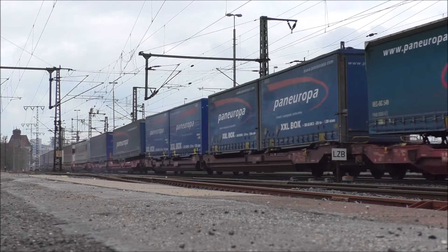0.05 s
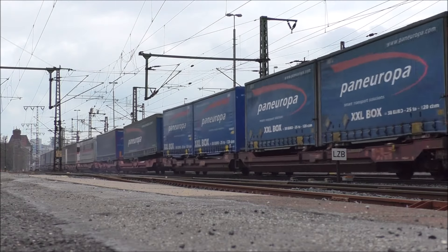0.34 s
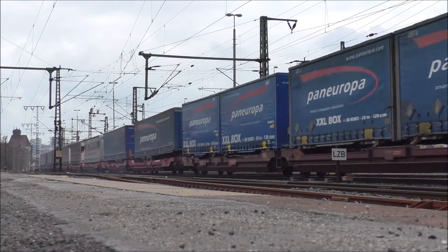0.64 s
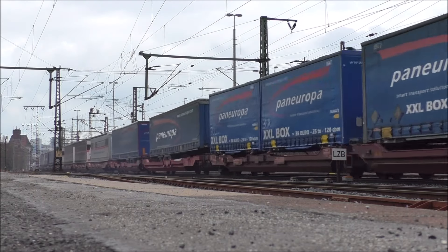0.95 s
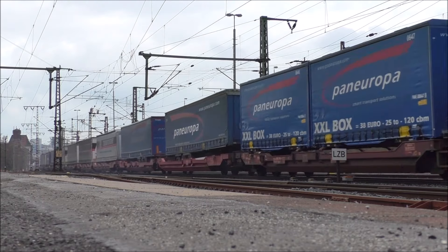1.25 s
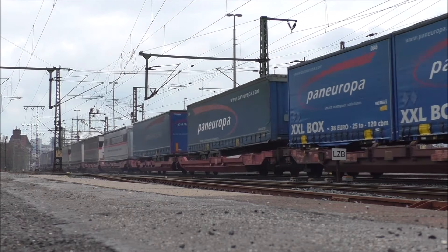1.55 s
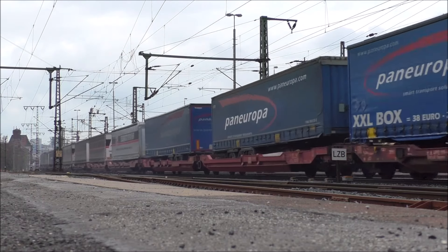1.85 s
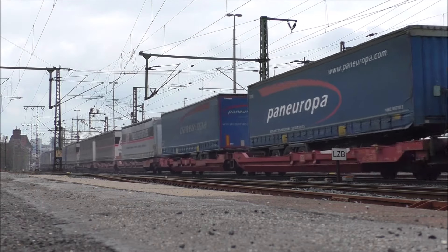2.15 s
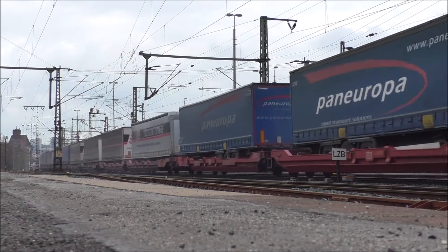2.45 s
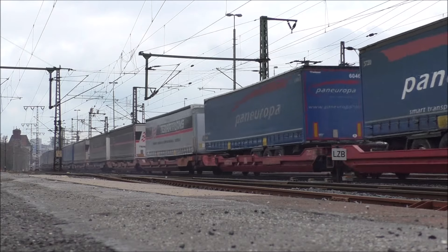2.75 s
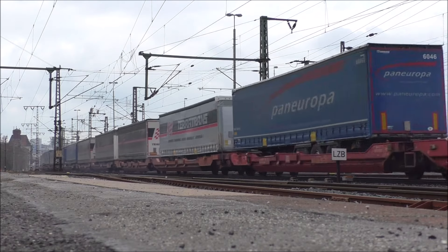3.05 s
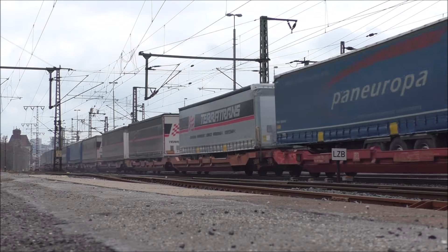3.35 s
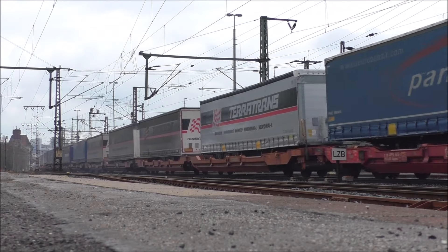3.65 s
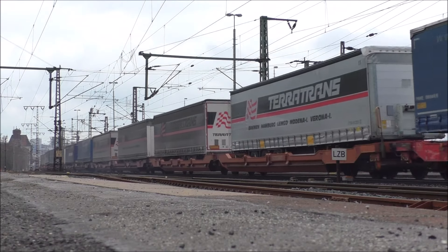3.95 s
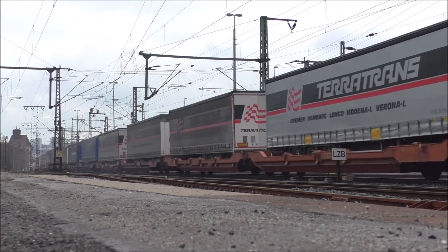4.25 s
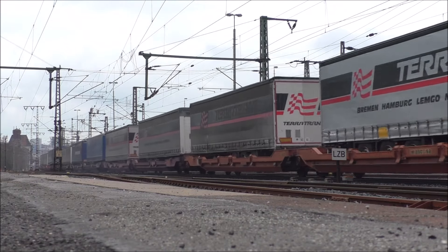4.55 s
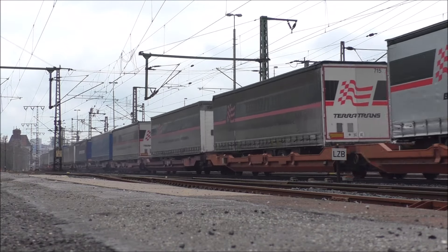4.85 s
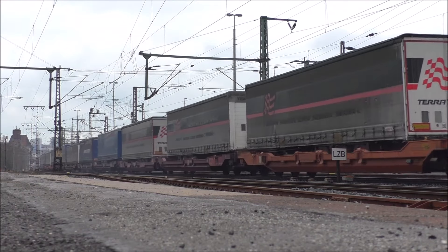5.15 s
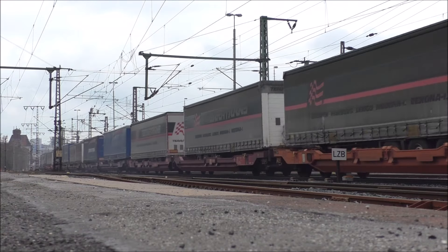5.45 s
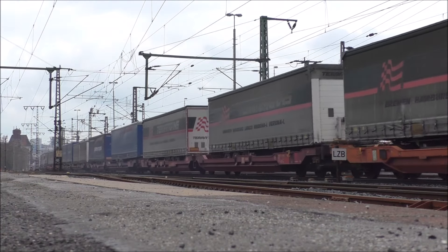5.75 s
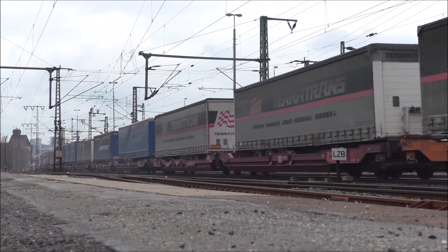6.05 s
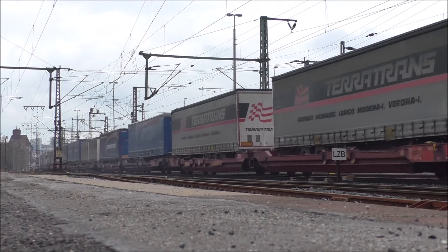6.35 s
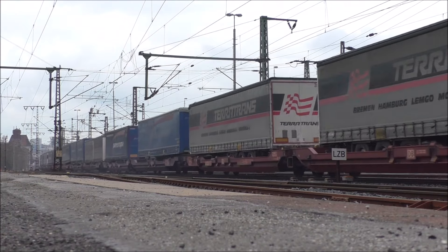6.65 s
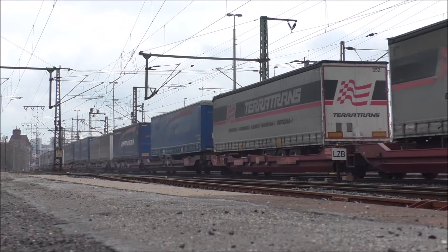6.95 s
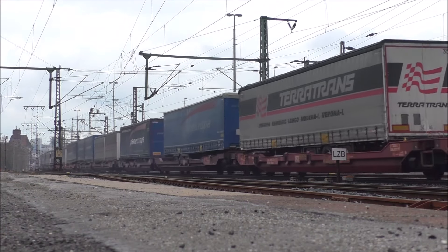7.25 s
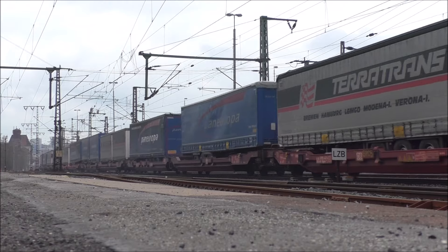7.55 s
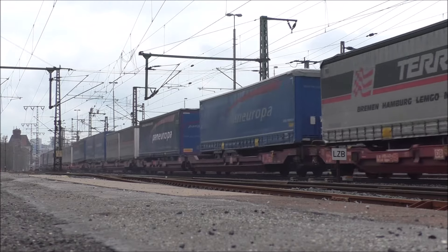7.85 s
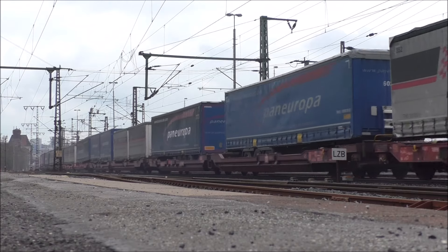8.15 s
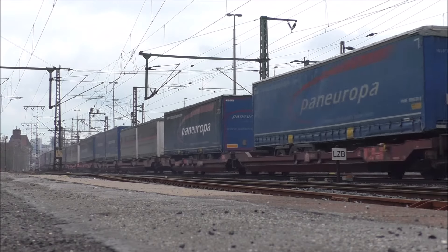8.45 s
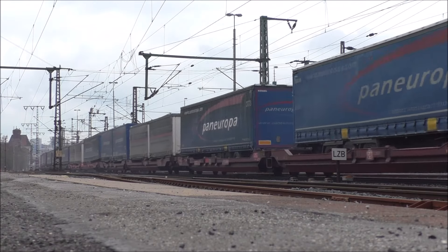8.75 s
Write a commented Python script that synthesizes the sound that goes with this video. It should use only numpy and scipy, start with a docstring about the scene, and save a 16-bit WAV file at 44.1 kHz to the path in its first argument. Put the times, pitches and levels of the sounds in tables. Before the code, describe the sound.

A long freight train rolls through a station yard about twelve metres away, braking lightly, for roughly nine seconds. From the start the wagons drone and rumble, the rails roar and the wheels ring, with a fine brake hiss and faint clinking that swell as each set of wheels passes. The rumble builds over the first two seconds, with occasional soft booms and hums from the wagon bodies. From about 1.5 seconds, brakes give short, high squeaks and wheels sing thin notes that sink slightly as they go by. From about 4.6 seconds, wheels and couplings clank irregularly with brief gritty scrapes, busiest between 6 and 7 seconds and again after 8. A sharper squeak stands out near 6.8 seconds. Towards the end the rail roar eases, while low track thudding, brake hiss and the squeal of distant wheels grow louder over the continuing rumble.

```python
"""A long freight train rolls through a station yard about twelve metres away, braking lightly.
First the wagons rumble, the rails roar, the wheels ring and the brake blocks hiss and scrape.
After a second or so, rubbing blocks make wheels squeak and sing two high notes that sink as they pass.
From halfway on, wheels and couplings clank, steel on steel. Towards the end the rails grow quieter,
while the hiss of the brakes and the squeal of distant wheels grow louder."""
import sys
import numpy as np
from scipy import signal
from scipy.fft import rfft, irfft
from scipy.io import wavfile
from scipy.ndimage import uniform_filter1d

SR = 44100
rng = np.random.default_rng(int(sys.argv[2]) if len(sys.argv) > 2 else 0)


def transcribe(signal):
    """Save signal, clipped to [-1, 1], as a 16-bit WAV file at the path in sys.argv[1]."""
    frames = np.atleast_2d(signal).T
    limited = np.clip(frames, -1, 1)
    pcm = np.round(limited * 32767).astype(np.int16)
    wavfile.write(sys.argv[1], SR, pcm)


N = 393372
TIME = np.arange(N) / SR
SPEED_M_S, DISTANCE_M, SOUND_SPEED_M_S = 18, 12., 343

# Levels in the tables are relative: the functions turn them up or down.
# drone of the wagon bodies: (time [s], level [dB])
RUMBLE_LEVEL = [(0, -48), (1.2, -44.5), (2.3, -42.5), (4, -42), (5.1, -41), (5.9, -43.5), (8.92, -42)]
# tone of that drone, from low to high: (frequency [Hz], level [dB])
RUMBLE_COLOUR = [(70, -57), (105, -36), (122, -32), (135, -7.5), (150, -13.5), (182, 1), (232, -1),
                 (258, 2), (285, -2), (308, -13), (355, -12.5), (410, -17.5), (520, -21.5), (1200, -75)]
# weight of the wagons, which deepens the rumble: (time [s], gain of the deep part [dB])
WAGON_LOAD = [(0, -6.5), (1.1, -3), (2.1, -7.5), (2.8, 0.5), (4.1, -0.5), (4.8, -6.5), (5.6, 0), (6.5, 0.5),
              (7.7, -2.5), (8.92, -2)]
# a wagon body booms as it rocks: (time [s], swell [dB])
BOOMS = [(2.149, 8.5), (2.51, 2), (4.37, 4.5), (4.685, 4.5), (4.77, 5.5), (4.94, 3.5), (5.21, 5), (5.76, 5),
         (6.05, 6), (6.99, 4.5), (7.47, 5), (8.068, 4), (8.61, 7), (8.82, 4.5)]
# thudding of the track on its bed of stones: (time [s], level [dB])
THUD_LEVEL = [(0, -69.5), (1.1, -64), (2.6, -64.5), (4.6, -63), (5.4, -64), (6.1, -59.5), (7.2, -60),
              (8, -62), (8.92, -57)]
# tone of that thudding: (frequency [Hz], level [dB])
THUD_COLOUR = [(15, -32), (30, -27), (45, -20), (62, -4), (74, -0.5), (85, 9), (97, 0.5), (115, 1),
               (170, -13), (600, -70)]
# roar of the rails: (time [s], level [dB])
RAIL_LEVEL = [(0, -52), (1.2, -47), (1.8, -48), (3.8, -51), (6.6, -53), (8.92, -55.5)]
# tone of that roar: (frequency [Hz], level [dB])
RAIL_COLOUR = [(150, -47), (270, 4.5), (345, 5.5), (420, -1.5), (520, -0.5), (680, 0.5), (950, -1),
               (1400, -10.5), (3000, -16.5), (8000, -60)]
# tone of the ringing wheels: (frequency [Hz], level [dB])
WHEEL_COLOUR = [(300, -18), (800, -7.5), (1200, 1.5), (1600, 2.5), (2300, -1), (3100, -5.5), (4200, -9),
                (5200, -12.5), (6500, -24.5), (9000, -32), (15000, -46)]
# hiss of the brake blocks along the whole train: (time [s], level [dB])
BRAKE_LEVEL = [(0, -63), (1, -69.5), (4, -67.5), (5.2, -66), (6.2, -64), (7.6, -62.5), (8.92, -62)]
# tone of that hiss: (frequency [Hz], level [dB])
BRAKE_COLOUR = [(1000, -16), (2500, 9.5), (4000, 10), (5300, 6), (6200, 9), (6700, 3.5), (7200, 4),
                (7900, -1.5), (9400, -3), (11100, -6), (12200, -9.5), (13000, -6.5), (14200, -18),
                (15200, -21)]
# bogies, the wheeled frames under a wagon: (passing time [s], wheel ring [dB], brake hiss [dB])
BOGIES = [(0.03, -52.5, -74), (.6, -61, -84), (1.06, -49.5, -67), (1.58, -49.5, -65.5), (2.0, -53.5, -73),
          (2.42, -51, -67.5), (2.96, -49.5, -67), (3.55, -55.5, -68.5), (4.57, -50, -71), (5.39, -53, -65),
          (6.24, -51.5, -64), (6.66, -55, -68), (7.36, -64, -71), (8.26, -52, -62.5), (8.7, -61, -63)]
# singing wheels: (passing time [s], pitch at rest [Hz], low note [dB], high note [dB], fade time [s])
SINGING_WHEELS = [(1.621, 5600, -68, -79, 0.3), (2.351, 5700, -65, -84, .4), (3.07, 5690, -65, -78, .7),
                  (3.281, 5940, -62, -77, 0.75), (4.201, 5770, -63, -78, 0.71),
                  (5.13, 5880, -64, -72, 0.79), (5.36, 5910, -60, -75, .9), (5.6, 5730, -62, -80, 0.57),
                  (6.399, 5700, -61, -72, .6), (7.28, 5660, -61, -72, .6), (7.35, 5745, -62, -69, 0.95),
                  (7.7, 5650, -62, -73, 0.55), (8.199, 5600, -62, -75, 0.5)]
# squeaks when a brake block grabs: (time [s], pitch [Hz], level [dB], rough length [s])
SQUEAKS = [(1.43, 11830, -71, 0.076), (1.638, 5575, -63, .07), (1.743, 5550, -59.5, 0.07),
           (1.73, 5410, -63, .06), (1.74, 11580, -70, 0.074), (2.445, 5550, -59.5, 0.066),
           (2.73, 11600, -71, .03), (2.74, 5845, -62, .06), (2.85, 5880, -59, 0.076),
           (2.995, 6065, -56.5, 0.14), (3.044, 12680, -72, 0.12), (3.144, 5900, -61.5, 0.12),
           (3.463, 5580, -58, 0.1), (3.604, 5730, -59, 0.15), (3.71, 5475, -59.5, 0.13),
           (3.764, 5700, -51.5, 0.075), (3.89, 6010, -61, 0.075), (3.92, 12200, -73, 0.13),
           (4, 12570, -70, .05), (4.464, 5800, -59, 0.08), (4.534, 12800, -74, .13),
           (4.647, 5970, -55, 0.061), (4.885, 5920, -57, 0.052), (4.887, 12400, -62.5, 0.046),
           (5.086, 6080, -60, 0.054), (5.418, 12200, -59, 0.028), (5.503, 5670, -55, 0.11),
           (5.64, 5760, -60, 0.088), (5.722, 11910, -62, 0.085), (5.8, 5740, -61, .08),
           (5.915, 5900, -55.5, 0.075), (5.903, 11950, -65, .03), (6.118, 12300, -65, 0.025),
           (6.275, 11900, -55, 0.031), (6.46, 11950, -57.5, 0.034), (6.466, 5600, -53, .06),
           (6.606, 5970, -56, 0.1), (6.66, 6150, -58, 0.046), (6.826, 11600, -53.5, 0.04),
           (6.83, 5570, -46, .035), (6.92, 11660, -65, .04), (7.093, 5870, -63, 0.11),
           (7.112, 12320, -64, .05), (7.248, 12040, -66, .08), (7.666, 5590, -58, 0.12),
           (7.69, 5490, -59, .08), (7.83, 5680, -60, .08), (7.85, 11900, -67, .05),
           (7.97, 5520, -60.5, 0.16), (8.252, 5770, -52.5, 0.077), (8.654, 11620, -64, .025)]
# knocks of wheels and couplings: (time [s], level [dB], centre of the ringing [Hz])
CLANKS = [(4.624, -42, 1400), (4.705, -49, 2300), (4.875, -44, 1980), (5.011, -42, 2300),
          (5.315, -49, 3000), (5.63, -41.5, 1500), (6.096, -39, 2600), (6.226, -43, 1400),
          (6.262, -42, 2500), (6.45, -38.5, 3200), (6.505, -58, 1400), (6.662, -38, 1500),
          (7.21, -44, 2300), (7.27, -49, 2600), (7.415, -44.5, 2500), (8.175, -40, 1400),
          (8.305, -48, 1300), (8.345, -43, 2500), (8.456, -41.5, 1500), (8.743, -42, 2300)]
# natural notes of the steel under the wagons: (pitch [Hz], level [dB], base time to fade by 60 dB [s])
STEEL_NOTES = [(1269, 9, 0.16), (1580, 6, 0.21), (2302, 9, 0.12), (2610, 1.5, 0.19), (4000, -5, .12),
               (7000, -5, 0.088), (8270, -1, 0.09), (9100, -8, 0.08), (10600, -19, .08), (11300, -2, .12)]
# scrapes of brakes and other steel parts: (time [s], level [dB], centre [Hz], rough length [s])
SCRAPES = [(.843, -65, 9000, .018), (1.61, -58, 5500, 0.029), (2.261, -61, 6560, .05),
           (2.587, -61, 5980, .03), (4.28, -62, 10000, .028), (4.317, -58, 10000, 0.028),
           (4.64, -59.5, 6500, .025), (4.877, -61, 9500, 0.012), (5, -52, 2200, 0.077),
           (5.31, -58, 3400, .022), (6.086, -52, 5030, 0.029), (6.088, -61, 8300, .025),
           (6.163, -58, 10000, 0.022), (6.21, -64, 9000, .035), (6.26, -54, 9000, .028),
           (6.268, -53, 5500, 0.022), (6.352, -59, 7500, .03), (6.625, -59, 8500, 0.027),
           (6.663, -46, 3600, 0.041), (6.815, -44, 4280, 0.034), (6.815, -58, 9000, 0.027),
           (7.646, -52, 1990, 0.07), (7.955, -63, 8000, .03), (8.347, -50, 2310, 0.043),
           (8.348, -58, 9500, .018), (8.437, -60, 10000, 0.079), (8.497, -59, 10000, .025),
           (8.553, -51, 3200, 0.034), (8.68, -55, 7000, 0.025), (8.747, -45, 3700, 0.021)]
# humming panels and wheels: (time [s], pitch [Hz], level [dB], half length [s], glide [Hz/s])
HUMS = [(1.417, 264, -47, 0.63, -33.5), (2.031, 283, -45.5, 0.48, -19.5), (3.1, 255, -48, .5, -3.5),
        (3.597, 259, -44.5, .45, 9.5), (4.05, 247, -42, 0.6, -8), (4.453, 345, -51, 0.44, 40.5),
        (4.65, 258, -41.5, 0.52, -4.5), (4.922, 248, -38.5, .2, 0.5), (5.05, 210, -46, .35, 16),
        (5.27, 286, -45.5, 0.34, -12.5), (5.97, 207, -42.5, .3, 75.5), (6.302, 255, -43.5, 0.23, 49.5),
        (6.849, 216, -51, .3, 69), (7.2, 793, -64, .4, -36), (7.52, 140, -53.5, 0.38, -47),
        (7.63, 772, -55.5, 0.46, -8), (8, 126.2, -59, .6, -4.5), (8.15, 267, -51, 0.38, 37.5),
        (8.449, 284, -49, .4, -23)]
# squeal of wheels farther down the train: (time [s], level [dB])
FAR_SQUEAL_LEVEL = [(0, -78), (2.2, -70), (3, -70), (4.4, -67), (5.5, -62), (7.5, -65), (8.3, -65),
                    (8.92, -60)]
# tone of that squeal: (frequency [Hz], level [dB])
FAR_SQUEAL_COLOUR = [(4500, -37), (5350, -2), (5600, 6), (6100, -5), (6450, -22), (8000, -45), (10800, -36),
                     (11450, -12), (11800, -5), (12250, -17), (12900, -26), (14000, -50)]
# how alike left and right sound: (frequency [Hz], likeness [0 to 1])
STEREO_LIKENESS = [(40, 0.54), (90, 0.92), (140, 0.93), (230, 0.98), (350, 0.97), (500, 0.92), (770, 0.76),
                   (1200, 0.77), (1900, 0.96), (4200, 0.94), (6050, 0.94), (6700, 1), (10800, 0.98),
                   (11900, 0.93), (13200, 1)]
# which side is louder: (frequency [Hz], left minus right [dB])
STEREO_BALANCE = [(60, -7), (92, -2), (140, -3.5), (210, 0.5), (330, 0), (500, 1), (770, -2.5), (1170, -4),
                  (1790, -4.0), (2740, -3.5), (4190, -3.0), (6410, 0), (9810, -1), (15000, -1.5)]
# how far the left wave runs ahead of the right: (frequency [Hz], phase [radians])
STEREO_LEAD = [(0, 0), (260, 0.055), (780, -0.079), (1640, 0.32), (4820, 0.42), (6720, 0.016),
               (15200, 0.13)]


def wagon_rumble(gain_db=2.22, deep_hz=225, evenness=0.97):
    """Wagon bodies drone and boom over the thudding track; heavy wagons bring out the deep part."""
    drone = noise(RUMBLE_COLOUR, band_hz=(130, 330), flicker_db=2.5, size=4096)
    # keeps the drone's loudness steady
    drone /= uniform_filter1d(drone ** 2, size=4400, axis=1) ** (evenness / 2)
    deep = signal.sosfiltfilt(signal.butter(3, deep_hz, fs=SR, output="sos"), drone)
    loaded = drone + (amp(follow(WAGON_LOAD)) - 1) * deep
    boom_db = sum(db * np.exp(-((TIME - when) / 0.031) ** 2) for when, db in BOOMS)
    bodies = loaded * amp(follow(RUMBLE_LEVEL) + boom_db + gain_db)
    thud_db = follow(THUD_LEVEL) + drift(rate_hz=10)
    return bodies + noise(THUD_COLOUR, band_hz=(55, 110), flicker_db=-1.0, size=8192) * amp(thud_db)


def rolling(ring_db, brake_db):
    """Rough wheel rims shake rail, wheel and brake block together; the blocks add a fine grit."""
    shake = drift(rate_hz=17)
    rail = noise(RAIL_COLOUR, band_hz=(450, 1100), flicker_db=0.64, size=2048)
    wheel = noise(WHEEL_COLOUR, band_hz=(1300, 3500), flicker_db=1.0, size=1024)
    brake = noise(BRAKE_COLOUR, band_hz=(6600, 11000), flicker_db=2.0, size=1024)
    grit_db = 0.5 * drift(rate_hz=620)
    return (rail * amp(follow(RAIL_LEVEL) + 0.8 * shake)
            + wheel * amp(ring_db - 1 + shake)
            + brake * amp(brake_db - 1.5 + grit_db + 1.1 * shake))


def singing_wheels(high_ratio=2.098):
    """Each braked wheel swells as it nears and sinks in pitch as it passes; its high note comes in fits."""
    out = np.zeros((2, N))
    grip = drift(rate_hz=34)  # the block grips and lets go
    for when, hz, low_db, high_db, fade_s in SINGING_WHEELS:
        near = abs(TIME - when) < 2
        t = TIME[near] - when
        along_m = SPEED_M_S * t
        away_m = np.hypot(along_m, DISTANCE_M)
        pitch = hz / (1 + SPEED_M_S / SOUND_SPEED_M_S * along_m / away_m)  # Doppler shift
        gain = DISTANCE_M / away_m / (1 + (t / fade_s) ** 4)
        low_grip, high_grip = (np.minimum(np.roll(grip, shift)[near], 2)
                               for shift in rng.integers(N, size=2))
        low = squeal(pitch, width_hz=65, tremble=0.00298)
        high = squeal(pitch * high_ratio, width_hz=150, tremble=0.00195)
        out[:, near] += gain * amp(low_db - 2.5 + 2 * low_grip) * low
        out[:, near] += gain * amp(high_db - 4 + 3.5 * high_grip) * high
    return out


def brake_squeaks(rise=0.22, fall=0.48, sink_per_s=0.062, gain_db=8.5):
    """A grabbing block makes one note of a wheel flare up roughly and ring out."""
    out = np.zeros((2, N))
    for when, hz, db, length in SQUEAKS:
        t = np.arange(0, 3 * length, 1 / SR)
        swell = (1 - np.exp(-(t / (rise * length)) ** 2)) * np.exp(-t / (fall * length))
        pitch = hz * (1 - sink_per_s * (t - length / 2))  # sinks as the wheel goes by
        tone = unit(swell * squeal(pitch, width_hz=hz / 105, tremble=0.004))
        add(out, when - length / 3, amp(db + gain_db) * tone * rms(swell))
    return out


def clanks(rise_s=0.00096, octaves=0.91, detune=0.04, linger=0.79, crack_db=-5.5, crack_s=0.0091):
    """Steel knocks on steel: a short crack, then a ring that favours a few of its natural notes."""
    out, t = np.zeros((2, N)), np.arange(SR // 3) / SR
    bright = signal.butter(2, (1100, 5500), "band", fs=SR)
    attack = np.minimum(t / rise_s, 1)
    tunings = rng.uniform(-0.95, 1, (len(CLANKS), len(STEEL_NOTES)))
    for (when, db, centre_hz), offsets in zip(CLANKS, tunings):
        ring, power = 0, 0
        for (hz, note_db, fade_s), offset in zip(STEEL_NOTES, offsets):
            share = amp(note_db) * np.exp(-.5 * (np.log2(hz / centre_hz) / octaves) ** 2)
            decay = amp(-60 * t / (linger * fade_s))
            pitch = np.full(len(t), hz * (1 + detune * offset))
            ring += share * decay * fuzzy_tone(pitch, width_hz=35)
            power += share ** 2
        crack = unit(signal.lfilter(*bright, rng.standard_normal((2, len(t))))) * np.exp(-t / crack_s)
        add(out, when, amp(db + 0.5) * attack * (ring / np.sqrt(power) + amp(crack_db) * crack))
    return out


def scrapes(rise_s=0.003, octaves=0.54, ring_width=0.012, grit_db=0.5, drag_db=-9, dull_hz=12500):
    """Steel slips with a short gritty hiss that rings the parts around it, then drags on more softly."""
    out, t = np.zeros((2, N)), np.arange(SR // 2) / SR
    hz = np.fft.rfftfreq(len(t), 1 / SR)
    steel = 1 + 0.67 * sum(1 / (1 + ((hz / note_hz - 1) / ring_width) ** 2)
                           for note_hz, _, _ in STEEL_NOTES)
    for when, db, centre_hz, length in SCRAPES:
        band = np.exp(-.5 * (np.log2((hz + 1) / centre_hz) / octaves) ** 2) / (1 + (hz / dull_hz) ** 8)
        grains = rng.standard_normal((2, len(t))) * amp(grit_db * waver(len(t), rate_hz=430))
        hiss = unit(irfft(rfft(grains) * band * steel, len(t)))
        slip = np.exp(-(t / length) ** 2)
        drag = amp(drag_db) * np.exp(-t / (1.6 * length))
        add(out, when, amp(db) * hiss * np.minimum(t / rise_s, 1) * np.maximum(slip, drag))
    return out


def panel_hums():
    """Panels and wheels swell into a single fuzzy, gliding note and fade again."""
    out = np.zeros((2, N))
    for when, hz, db, half_s, glide in HUMS:
        swell = np.hanning(round(2 * half_s * SR)) ** 2
        pitch = hz + glide * np.linspace(-half_s, half_s, len(swell))
        tone = unit(swell * squeal(pitch, width_hz=hz / 110, tremble=0.004, tremble_hz=8.2))
        add(out, when - half_s, amp(db) * tone * rms(swell))
    return out


def clinks(rolling_db, per_s=34, spread_db=4.0, gain_db=-8.0, detune=0.0397, tick_s=0.008):
    """Loose brake rods clink at random, harder where the wheels roll louder."""
    out, t = np.zeros((2, N)), np.arange(SR // 6) / SR
    hz, db, fade_s = np.transpose(STEEL_NOTES)[:, :, None]
    decay = amp(db - 60 * t / fade_s)
    dull = signal.butter(2, 4500, fs=SR)  # the wagon frames shield the sharp edge of each tick
    for place, chance, tuning, *phases in rng.random((round(per_s * N / SR), 3 + len(STEEL_NOTES))):
        turns = hz * (1 + detune * (tuning - .5)) * t + np.array(phases)[:, None]
        ring = (decay * np.exp(2j * np.pi * turns)).sum(0)
        tick = 0.9 * signal.lfilter(*dull, rng.standard_normal((2, len(t))) * np.exp(-t / tick_s))
        strength = amp(spread_db * min(-np.log(chance), 3))
        add(out, place * N / SR, strength * (np.array([ring.real, ring.imag]) + tick))
    return unit(out) * amp(gain_db + rolling_db)


def far_squeal():
    """Many distant wheels squeal at once, smeared into two flickering bands."""
    blur = noise(FAR_SQUEAL_COLOUR, band_hz=(0, SR / 2), flicker_db=3.0, size=1024)
    return blur * amp(follow(FAR_SQUEAL_LEVEL))


def passing_bogies(train_db, column, reach_m=3.37):
    """Level in dB of the whole train plus each bogie, which swells and fades as it goes by."""
    power = amp(train_db) ** 2
    for bogie in BOGIES:
        along = SPEED_M_S * (TIME - bogie[0]) / reach_m
        power = power + amp(bogie[column]) ** 2 / (1 + along ** 2) ** 2
    return 10 * np.log10(power)


def squeal(hz, width_hz, tremble, tremble_hz=35):
    """A note whose pitch trembles as the rubbing parts stick and slip."""
    return fuzzy_tone(hz * (1 + tremble * waver(len(hz), tremble_hz)), width_hz)


def fuzzy_tone(hz, width_hz):
    """Ringing steel: a tone that follows the pitch curve hz; more width makes it fuzzier."""
    keep = np.exp(-np.pi * width_hz / SR)
    real, imag = rng.standard_normal((2, 2, len(hz)))
    swell = signal.lfilter([1], [1, -2 * keep, keep * keep], real + 1j * imag)
    return unit((swell * np.exp(2j * np.pi * np.cumsum(hz) / SR)).real)


def noise(colour, band_hz, flicker_db, size):
    """Two unrelated noises of one colour, flickering in patches, of strength 1 within the band."""
    hz = np.fft.rfftfreq(size, 1 / SR)
    shape = (4 * N // size + 5, len(hz))  # time slices by frequencies
    real, imag = rng.standard_normal((2, 2) + shape)
    patches = uniform_filter1d(rng.standard_normal(shape), size=12, axis=0)
    patches = unit(uniform_filter1d(patches, size=7, axis=1))
    slices = (real + 1j * imag) * amp(read(colour, hz) + flicker_db * patches)
    sound = signal.istft(slices.transpose(0, 2, 1), nperseg=size, noverlap=size - size // 4)[1][:, :N]
    power = (abs(slices) ** 2).mean((0, 1))
    in_band = (hz > band_hz[0]) & (hz < band_hz[1])
    return unit(sound) * np.sqrt(power.sum() / power[in_band].sum())


def waver(count, rate_hz):
    """Quick unevenness of a slipping contact, of strength 1."""
    keep = np.exp(-2 * np.pi * rate_hz / SR)
    return unit(signal.lfilter([1], [1, -2 * keep, keep * keep], rng.standard_normal(count)))


def drift(rate_hz):
    """A random wander of strength 1, up to about the given rate."""
    hz = np.fft.rfftfreq(N, 1 / SR)
    return unit(irfft(rfft(rng.standard_normal(N)) / (1 + (hz / rate_hz) ** 4), N))


def amp(db):
    """Turns decibels into a gain."""
    return 10 ** (np.asarray(db) / 20)


def rms(x):
    """Average strength of a signal (root mean square)."""
    return np.sqrt(np.mean(abs(x) ** 2) + 1e-20)


def unit(x):
    """Scales a signal to strength 1."""
    return x / rms(x)


def read(table, hz):
    """Reads a frequency table between its rows, with octaves evenly spaced."""
    row_hz, values = np.transpose(table)
    return np.interp(np.log(hz + 1), np.log(row_hz + 1), values)


def follow(table):
    """Reads a time table at every sample."""
    return np.interp(TIME, *np.transpose(table))


def add(mix, start_s, sound):
    """Mixes a sound in at the given time."""
    part = mix[:, max(round(start_s * SR), 0):][:, :sound.shape[1]]
    part += sound[:, :part.shape[1]]


def stereo(pair):
    """Blends two unrelated versions of the sound into a close left-right pair."""
    hz = np.fft.rfftfreq(N, 1 / SR)
    shared, apart = rfft(pair)
    alike = np.clip(read(STEREO_LIKENESS, hz), 0, 1)
    shared, apart = shared * np.sqrt((1 + alike) / 2), apart * np.sqrt((1 - alike) / 2)
    tilt = amp(read(STEREO_BALANCE, hz) / 2) * np.exp(.5j * read(STEREO_LEAD, hz))
    return irfft(np.array([(shared + apart) * tilt, (shared - apart) / tilt]), N)


def limiter(sound, ceiling_db=-31.0, recovery_db_per_s=122.0):
    """Turns the volume down at once on each peak and lets it back up quickly."""
    over_db = np.maximum(20 * np.log10(abs(sound).max(0) + 1e-9) - ceiling_db, 0)
    recovery_db = TIME * recovery_db_per_s
    cut_db = np.maximum.accumulate(over_db + recovery_db) - recovery_db
    return sound / amp(uniform_filter1d(cut_db, size=60))


def scene():
    """The whole train, heard in stereo."""
    ring_db = passing_bogies(train_db=-52.5, column=1)
    brake_db = passing_bogies(train_db=follow(BRAKE_LEVEL), column=2)
    steel = rolling(ring_db, brake_db) + clinks((ring_db + brake_db) / 2) + scrapes() + clanks()
    wagons = wagon_rumble() + panel_hums()
    return stereo(wagons + steel + singing_wheels() + far_squeal() + brake_squeaks())


def record(dry):
    """Holds down the peaks and cuts the highest treble."""
    limited = limiter(dry * amp(0.8))
    treble_cut = signal.firwin(511, 15400, window=("kaiser", 9), fs=SR)
    return signal.oaconvolve(limited, treble_cut[None], "same")


dry = scene()
out = record(dry)
transcribe(out)
```